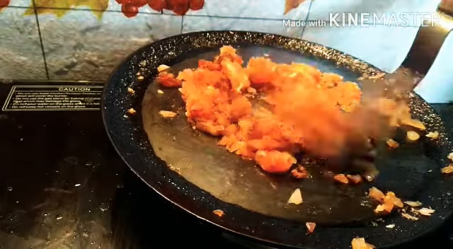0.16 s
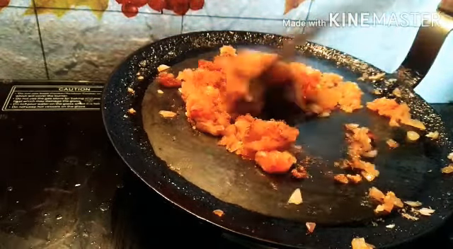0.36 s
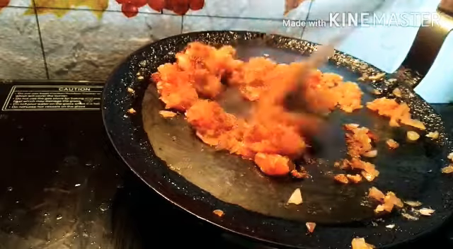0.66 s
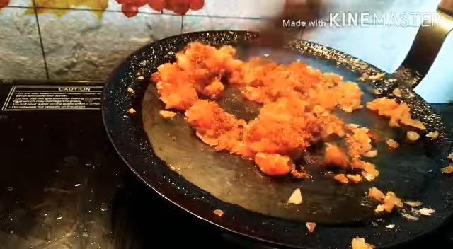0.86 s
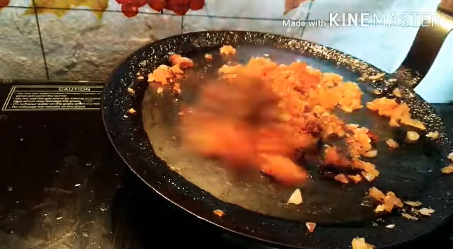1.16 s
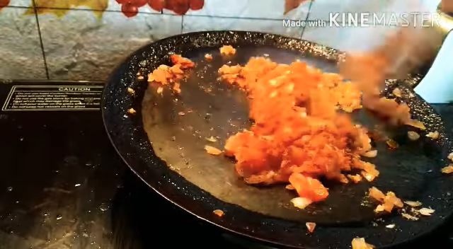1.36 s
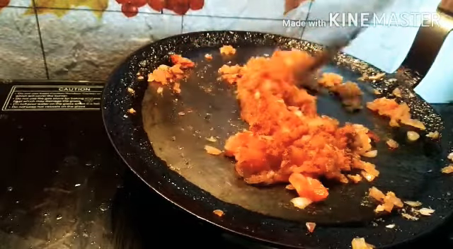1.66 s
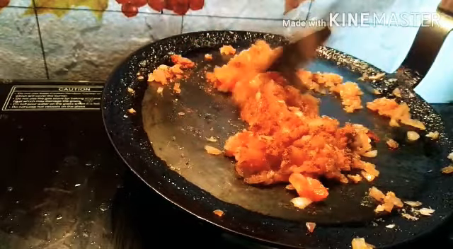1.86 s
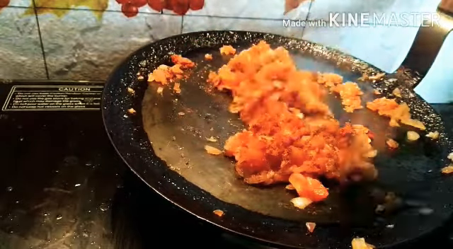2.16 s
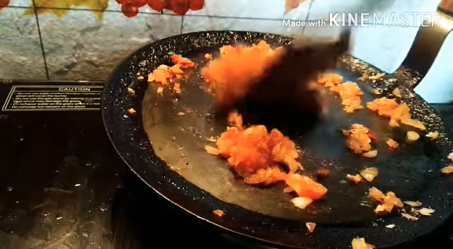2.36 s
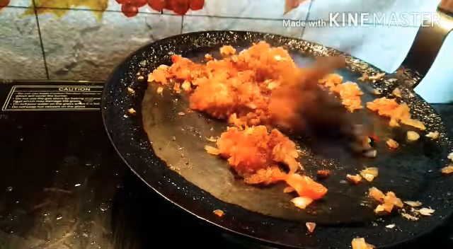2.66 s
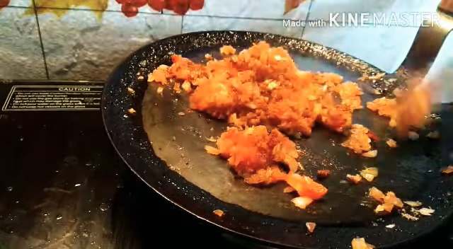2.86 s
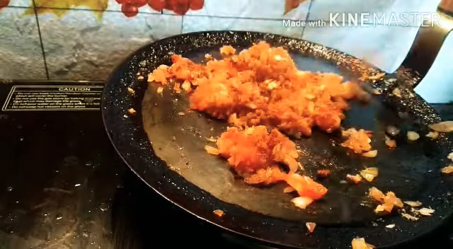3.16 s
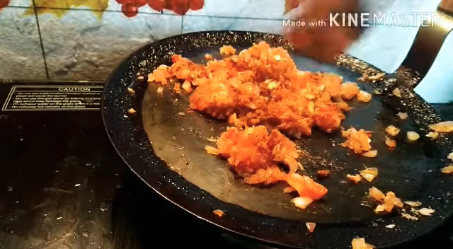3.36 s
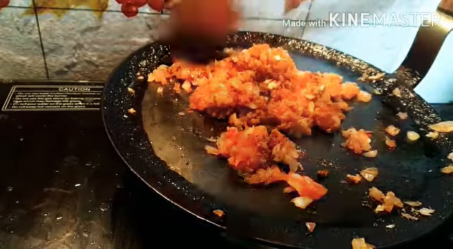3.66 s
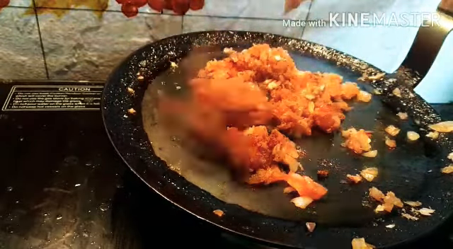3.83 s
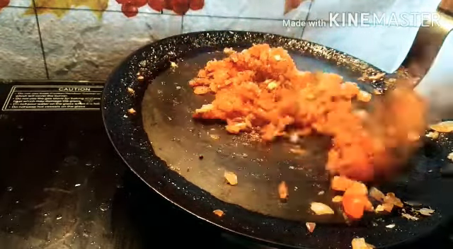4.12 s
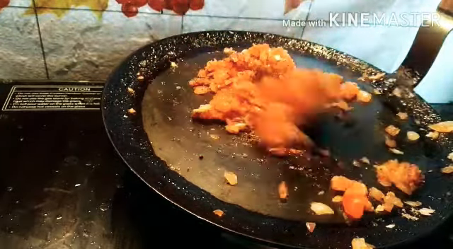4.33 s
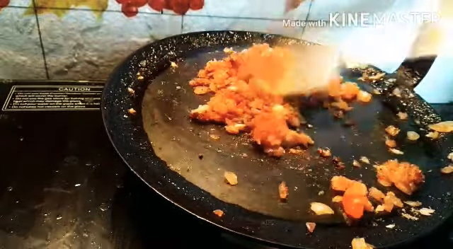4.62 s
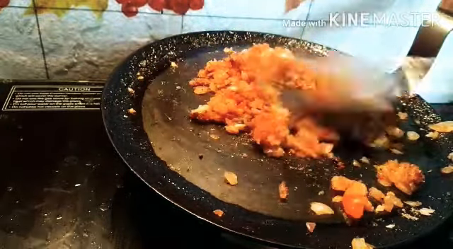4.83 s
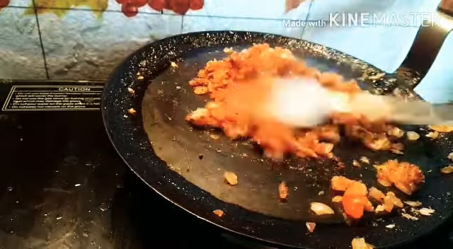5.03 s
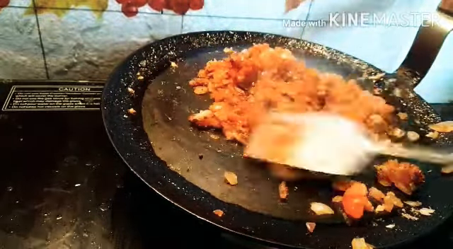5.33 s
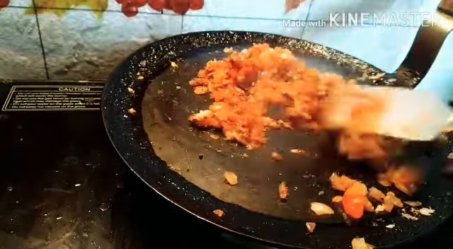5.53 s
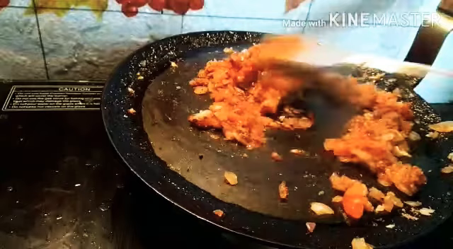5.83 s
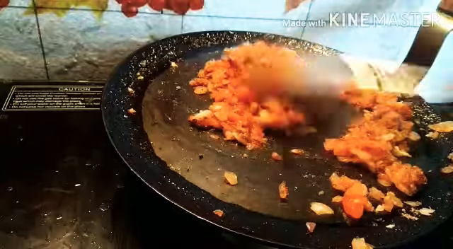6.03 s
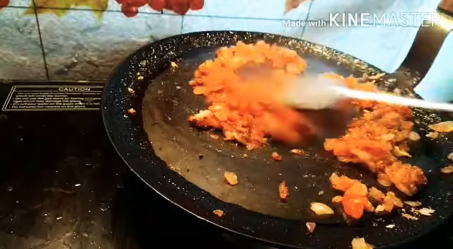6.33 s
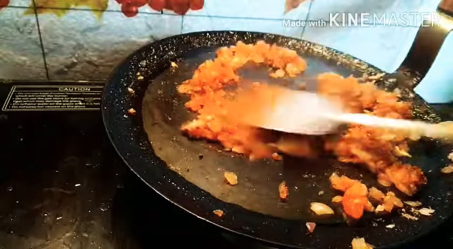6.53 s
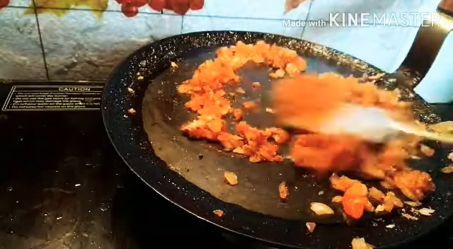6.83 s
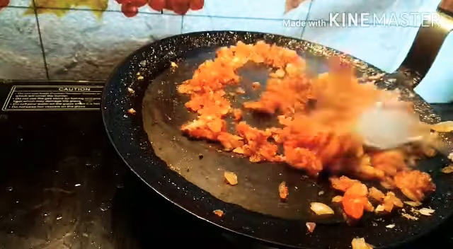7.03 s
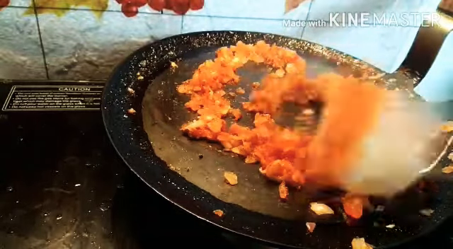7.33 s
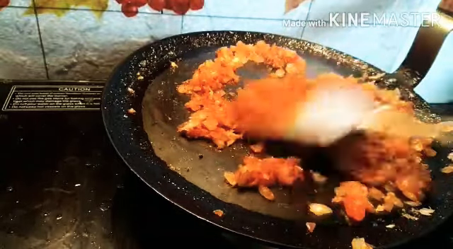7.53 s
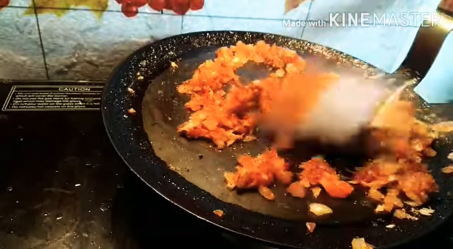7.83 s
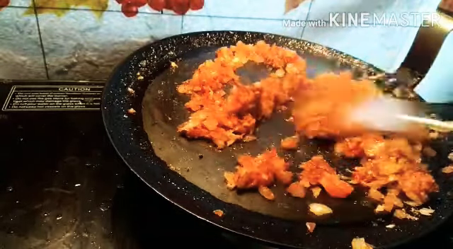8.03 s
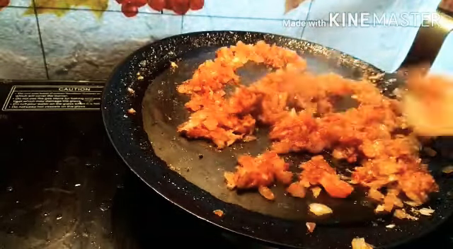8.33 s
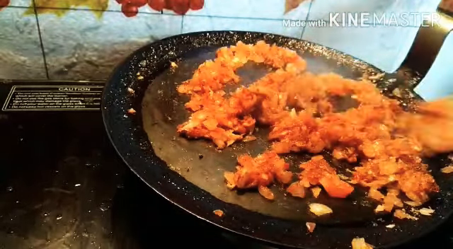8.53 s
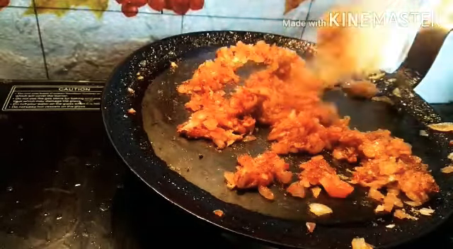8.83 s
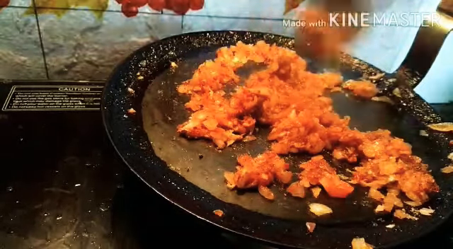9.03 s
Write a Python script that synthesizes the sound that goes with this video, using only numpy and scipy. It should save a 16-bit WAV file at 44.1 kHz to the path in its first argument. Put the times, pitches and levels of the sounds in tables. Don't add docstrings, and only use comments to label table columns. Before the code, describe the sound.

Faint, steady frying fizz underlies irregular metal-on-iron strikes, captured very close in stereo with slight room reflections. Early clacks come about every half second, crisp and ringing briefly, each followed by a short scrape and a dull thump of food and pan. The middle turns quiet, with low muffled knocks and soft brushing. Weak scrapes return after seven seconds, and a hard metallic hit closes it.

```python
import sys
import numpy as np
from scipy import signal
from scipy.fft import rfft, irfft, next_fast_len
from scipy.io import wavfile
from scipy.ndimage import map_coordinates

SR = 44100
rng = np.random.default_rng(int(sys.argv[2]) if len(sys.argv) > 2 else 0)


def put_to_file(sound):
    columns = np.atleast_2d(sound).T
    safe = np.clip(columns, -1, 1)
    whole_steps = np.round(safe * 32767)
    wavfile.write(sys.argv[1], SR, whole_steps.astype(np.int16))


def linear_from_db(decibels):
    return 10 ** (np.asarray(decibels, float) / 20)


N = 404838


def rms_one(x):
    return x / np.sqrt(np.mean(x ** 2) + 1e-20)


def at_hz(points, hz):
    table_hz, values = np.transpose(points)
    return np.interp(np.log(hz + 1), np.log(table_hz), values)


def colour(x, gain):
    size = next_fast_len(N + 4096)
    hz = np.arange(size // 2 + 1) * SR / size
    return irfft(rfft(x, size) * gain(hz), size)[..., :N]


def band(x, low_hz, high_hz):
    return signal.sosfilt(signal.butter(2, [low_hz, high_hz], "band", fs=SR, output="sos"), x)


def wander(depth_db, per_s):
    knots = linear_from_db(depth_db * rng.standard_normal(400))
    return np.interp(np.arange(N) * per_s / SR, np.arange(400), knots)


def patchy(x, depth_db, width_hz, length_s):
    hz, s, cells = signal.stft(x, SR, nperseg=1024)
    knots = rng.standard_normal((240, 400))
    where = np.meshgrid(hz / max(width_hz, 100), s / max(length_s, 0.025), indexing="ij")
    chance = map_coordinates(knots, where, order=1)
    gain = linear_from_db(depth_db * np.minimum(chance, 0.31 * chance))
    return signal.istft(cells * gain, SR, nperseg=1024)[1][:, :N]


def grit(per_s, spread_db):
    # (frequency [Hz], left-right correlation)
    likeness = [(60, 0.9), (180, 1), (550, 0.48), (1650, 0.3), (4970, -0.32), (15000, -0.13)]
    sizes = linear_from_db(spread_db * np.minimum(rng.exponential(1, (2, N)), 5))
    sizes = sizes * rng.choice([-1, 1], (2, N))
    mid, side = sizes * (rng.random((2, N)) < per_s / SR)
    mid = colour(mid, lambda hz: np.sqrt(1 + np.clip(at_hz(likeness, hz), 0, 1)))
    side = colour(side, lambda hz: np.sqrt(1 - np.clip(at_hz(likeness, hz), 0, 1)))
    return rms_one(np.array([mid + side, mid - side]))


def body(force, modes, wander_db, wander_per_s):
    out = 0
    for hz, level_db, t60 in modes:
        r = linear_from_db(-60 / (t60 * SR))
        w = 2 * np.pi * hz / SR
        drive = force * wander(wander_db, wander_per_s) * linear_from_db(level_db) * np.sqrt(2 * (1 - r * r))
        out = out + signal.lfilter([0, np.sin(w)], [1, -2 * r * np.cos(w), r * r], drive + 1e-18)
    return out / np.sqrt(np.sum(linear_from_db(2 * np.array(modes)[:, 1])))


def swell(start, fullest, end, power):
    away = np.interp(np.arange(N) / SR, [start, fullest, end], [1, 0, 1])
    return linear_from_db(-23.5 * away ** power) * (away < 1)


def kitchen(x):
    t60_s, level_db = 0.37, -18
    t = np.arange(SR // 2) / SR
    tail = rng.standard_normal((2, len(t))) * linear_from_db(-60 * t / t60_s) * (t > 0.004)
    tail = signal.lfilter([1], [1, -0.3], tail)
    tail = tail / np.sqrt(np.sum(tail[0] ** 2))
    return linear_from_db(level_db) * signal.fftconvolve(x, tail, axes=1)[:, :N]


def sizzle():
    # (time [s], level [dB])
    frying = [(0.0, -49.5), (0.51, -52), (0.69, -49.5), (2.12, -48), (3.3, -50.5), (3.58, -49.5),
              (4.58, -52), (5.47, -52), (6.59, -51), (7.62, -51), (7.85, -52.5), (8.97, -53.5), (9.18, -52)]
    # (frequency [Hz], density [dB per Hz])
    pop_spectrum = [(24, -28), (40, -20), (96, -4.5), (180, -11), (516, -9.5), (831, -12), (1340, -13.5),
                    (1480, -7), (1720, -9), (3930, -7.5), (4570, -5.5), (7000, -8.5), (11600, 1.5),
                    (14800, -4.5), (16000, -14.5)]
    pops = colour(grit(per_s=15000, spread_db=3.0), lambda hz: linear_from_db(at_hz(pop_spectrum, hz)))
    pops = patchy(pops, depth_db=8.0, width_hz=96, length_s=0.037)
    s, level_db = np.transpose(frying)
    level_db = np.interp(np.arange(N) / SR, s, level_db)
    return linear_from_db(level_db + 2.5) * wander(0.41, per_s=4.0) * rms_one(pops)


def food_motion():
    # (thud [dB], tumble [dB])
    rest_db = (-71.5, -77)
    # (time [s], thud [dB], tumble [dB])
    jolts = [(.195, -34.5, -33), (.61, -83, -44), (1.015, -47, -28), (1.52, -39.5, -36.5),
             (1.84, -46, -32.5), (2.25, -36.5, -24.5), (2.975, -38, -25), (3.45, -60, -36),
             (4.26, -40, -29.5), (7.1, -40, -43), (9.05, -84, -33)]
    # (thud [dB/s], tumble [dB/s])
    jolt_fade = (152, 227.5)
    # (start [s], fullest [s], end [s], thud [dB], tumble [dB])
    rolls = [(-.2, 0.046, 0.31, -85, -48.5), (0.857, 0.986, 0.99, -81, -58), (2.56, 2.656, 2.6, -85, -65),
             (2.765, 2.92, 2.99, -59, -75), (2.977, 3.133, 3.42, -97, -56), (3.987, 4.13, 4.6, -87, -63),
             (5.248, 5.495, 5.7, -61.5, -59.5), (5.65, 5.755, 5.84, -61, -52.5),
             (5.777, 5.917, 6.06, -39.5, -85), (6.223, 6.33, 6.43, -59, -50), (7.118, 7.19, 7.2, -52, -60),
             (6.35, 6.46, 6.65, -54, -85), (6.698, 6.84, 7.7, -66, -95.5), (6.856, 6.962, 7.08, -73, -66),
             (7.284, 7.402, 7.55, -82, -59.5), (7.448, 7.553, 7.7, -48, -59), (7.648, 7.796, 8.1, -77, -56),
             (8.29, 8.4, 8.55, -61, -58.5), (8.497, 8.643, 8.92, -64, -55)]
    motion = linear_from_db(np.array(rest_db))[:, None] * np.ones(N)
    t = np.arange(SR // 2) / SR
    for s, *levels_db in jolts:
        at = round(s * SR)
        settling = linear_from_db(np.c_[levels_db] - np.c_[list(jolt_fade)] * t)
        motion[:, at:at + len(t)] += settling[:, :N - at]
    for start, fullest, end, *levels_db in rolls:
        motion += linear_from_db(np.c_[levels_db]) * swell(start, fullest, end, power=1.38)
    return motion


def food():
    # (frequency [Hz], level [dB], t60 [s])
    pan_modes = [(91.6, -5, 0.105), (120, -2.5, 0.035), (265, -6.5, 0.11), (351, -1.5, 0.027),
                 (413, -3.5, 0.053), (518, 4, 0.061), (599, -6, 0.05)]
    # (time [s], peak [dB], hollow knock [dB])
    bumps = [(0.617, -70, -30), (2.619, -69, -65), (5.381, -47, -54.5), (5.479, -56, -64),
             (5.569, -65, -52), (5.75, -67, -52), (5.808, -30, -61), (5.852, -23, -63), (5.875, -25, -65),
             (5.925, -25.5, -70), (6.028, -40, -54), (6.919, -64, -67), (7.118, -44, -40), (7.19, -32, -54),
             (7.597, -35, -57), (7.752, -72, -54), (7.865, -61, -41.5), (8.419, -38, -61),
             (8.565, -27.5, -56), (8.619, -51, -43), (8.76, -64, -52)]
    lumps = grit(per_s=2500, spread_db=2.0)
    thud, tumble = linear_from_db(-2.0) * food_motion()[:, None] * lumps
    s, peak_db, knock_db = np.transpose(bumps)
    at = [round((time - 0.006) * SR) for time in s]
    thud[:, at] += linear_from_db(peak_db + 13.5)
    tumble[:, at] += linear_from_db(knock_db + 21.0)
    low = band(body(thud, pan_modes[:2], wander_db=4.5, wander_per_s=7.3), 37, 150)
    hollow = band(body(tumble, pan_modes[2:], wander_db=7.0, wander_per_s=12), 248, 610)
    return low + hollow


def edge_catch():
    # (time [s], peak [dB], centre [Hz], width [Hz], decay [s])
    snags = [
        (8.0755, -25, 11600, 700, 0.025),
        (8.125, -38, 5700, 1000, 0.05),
        (8.122, -44, 2000, 500, 0.03),
        (4.836, -46, 11300, 1200, .025),
    ]
    noise, out = rng.standard_normal((2, N)), 0
    for s, peak_db, hz, width_hz, decay_s in snags:
        t = np.arange(N) / SR - s
        rasp = rms_one(band(noise, hz - width_hz / 2, hz + width_hz / 2))
        out = out + linear_from_db(peak_db) * (t > 0) * np.exp(-np.maximum(t, 0) / decay_s) * rasp
    return out


def sliding_force():
    # (time [s], grinding [dB], fade [dB/s], edge brightness [dB], plate weight [dB])
    skids = [(0.205, -27.5, 214, 6, -1.5), (0.608, -29.5, 144, 4.5, -8), (1.011, -27.5, 231, 5, -4.5),
             (1.517, -23.5, 165, 3, -7), (1.836, -28.5, 144, 8.5, 3.5), (2.247, -20.5, 159, 6.5, 2.5),
             (2.971, -18.5, 245, 3.5, -3), (3.446, -28, 157, 4, 7), (4.255, -18.5, 231, 7, 0),
             (7.096, -43.5, 88, -3.5, -5), (7.472, -28.5, 213, 5, -9.5), (8.073, -47, 199, 16, 2),
             (9.046, -21, 181.5, -0.5, -7.5)]
    # (edge [dB/s], shank [dB/s], plate [dB/s])
    skid_shift = (15.5, -33, -120)
    # (start [s], fullest [s], end [s], grinding [dB], edge brightness [dB])
    sweeps = [(-.05, .02, 0.24, -57, 6.5), (0.415, 0.61, 0.61, -45, -6), (1.153, 1.202, 1.285, -41.5, 1.5),
              (1.876, 1.93, 2.017, -39.5, 10), (2.495, 2.658, 2.79, -48.5, -4),
              (3.903, 3.994, 3.92, -52, 5), (4.63, 4.658, 4.86, -51.5, -8), (4.798, 4.855, 4.86, -51.5, 3),
              (5.3, 5.434, 5.6, -58.5, 6), (5.897, 6.001, 6.13, -39, -10), (6.206, 6.304, 6.4, -46.5, -11),
              (7.406, 7.47, 7.48, -47, -3), (7.137, 7.17, 6.56, -45.5, 7), (8.112, 8.16, 8.23, -48.5, 2),
              (9.14, 9.195, 9.7, -40, -4)]
    # (start [s], fullest [s], end [s], grinding [dB], shank weight [dB])
    presses = [(1.16, 1.246, 1.236, -43, -31), (4.673, 4.754, 4.88, -61, 11.5),
               (5.414, 5.467, 6.05, -68, 0), (5.622, 5.658, 5.76, -55.5, -9), (6.248, 6.33, 6.41, -50, 0),
               (7.146, 7.162, 7.27, -44.5, -12.5), (8.53, 8.555, 8.6, -53.5, -9),
               (8.593, 8.613, 8.68, -53.5, -17), (9.08, 9.174, 9.7, -37, -10)]
    bite_s, lift_off_db_per_s2 = 0.017, 299
    lead_in_s, lead_in_db = 0.016, -25
    sliding = np.zeros((4, N))
    t = np.arange(SR // 2) / SR
    lead = round(lead_in_s * SR)
    for s, grind_db, fade, edge_db, plate_db in skids:
        at = round(s * SR)
        shares_db = np.array([[0], [edge_db], [-3 + 0.34 * plate_db], [plate_db]])
        fades = fade - np.array([0, *skid_shift])[:, None]
        fall_db = fades * np.maximum(t - bite_s, 0) + lift_off_db_per_s2 * t ** 2
        skid = np.minimum(t / bite_s, 1) * linear_from_db(grind_db + shares_db - fall_db)
        sliding[:, at - lead:at] += linear_from_db(grind_db + lead_in_db + shares_db) * np.linspace(0, 1, lead)
        sliding[:, at:at + len(t)] += skid[:, :N - at]
    for *span, grind_db, edge_db in sweeps:
        shares_db = np.array([[0], [edge_db], [-6], [-21.5]])
        sliding += linear_from_db(grind_db + shares_db) * swell(*span, power=2)
    for *span, grind_db, shank_db in presses:
        sliding[2:] += linear_from_db(grind_db + np.array([[shank_db], [0]])) * swell(*span, power=2)
    return sliding


def striking_force():
    # (time [s], peak [dB], edge brightness [dB], shank weight [dB], plate weight [dB])
    blows = [(0.19, -33, -1, -10, 9), (0.6083, -11.5, 5, -12, -12), (1.0124, -12, -0.5, 1, 4),
             (1.514, -12, 7, -10.5, -18), (1.5262, -18, 0, -16, -16), (1.8371, -11, 6, -8.5, 4.5),
             (2.248, -4.5, 10.5, -8, -6), (2.974, 0.5, -1, -17, -17), (3.4474, -3.5, 0.5, -9, 0),
             (4.255, 1.5, 0.5, -15, -14), (6.3094, -44, -14, -15, 11), (7.099, -26.5, -19, -11, -22),
             (7.469, -22.5, 4.5, -26, -25), (8.074, -38.5, 14, -6, -5), (9.0478, 1.5, -5.5, -18.5, -6)]
    # (time [s], peak [dB], edge brightness [dB])
    hops = [(0.676, -38, 15), (1.562, -18.5, -2), (1.9208, -22.5, -1), (2.333, -16.5, -17),
            (4.6573, -51, -10), (4.833, -48, 13), (6.242, -39, -14), (7.171, -38, 0), (8.1283, -47.5, 9)]
    hop_shank_db, hop_plate_db = -12, -22.5
    striking = np.zeros((4, N))
    t = np.arange(SR // 2) / SR
    pulse = (1 - np.exp(-t / 0.0022)) * np.exp(-t / 0.0046)
    contacts = blows + [(*hop, hop_shank_db, hop_plate_db) for hop in hops]
    for s, peak_db, edge_db, shank_db, plate_db in contacts:
        at = round(s * SR)
        shares_db = np.array([[0], [edge_db + 3.0], [shank_db + 12.0], [plate_db + 4.0]])
        striking[:, at:at + len(t)] += linear_from_db(peak_db - 3 + shares_db) * pulse[:N - at]
    return striking


def spatula():
    # (frequency [Hz], level [dB], t60 [s])
    blade_modes = [(3930, -20.5, .04), (3760, -13.5, 0.02), (4500, -12.5, 0.15), (4730, -10.5, 0.15),
                   (4870, 9, 0.059), (5260, 5, 0.16), (5760, 7.5, 0.11), (6560, -7, 0.016)]
    # (frequency [Hz], level [dB], t60 [s])
    edge_modes = [(7860, -27.5, .03), (8360, 3.5, 0.055), (8960, -8, 0.063), (9700, -36, .03),
                  (9840, 3, .05), (11160, -3, 0.068), (10850, -20.5, 0.033), (10540, -7.5, 0.042),
                  (11300, 3.5, 0.054), (13600, -8, 0.032), (12750, -5, .03), (13900, -0.5, 0.017)]
    # (frequency [Hz], level [dB], t60 [s])
    shank_modes = [(1465, -2.5, 0.2), (1483, 3.5, 0.088), (1957, 11, 0.029), (1990, -13, 0.023),
                   (2687, 0.5, 0.019), (3100, -17, 0.081)]
    # (frequency [Hz], level [dB], t60 [s])
    plate_modes = [(765, 1.5, 0.11), (845, -0.5, 0.06), (884, 1.5, 0.075), (918, 14.5, 0.053),
                   (980, -8.5, 0.076)]
    # (frequency [Hz], density [dB per Hz])
    grind_spectrum = [(180, -38.5), (300, -1.5), (519, -17.5), (762, -52.5), (915, -2.5), (1060, -3.5),
                      (1410, -3), (2360, -8), (4670, -8.5), (7320, -8), (11300, -5), (15200, -14),
                      (16000, -41.5)]
    contacts = grit(per_s=6000, spread_db=3.0)
    rasping = colour(contacts, lambda hz: linear_from_db(at_hz(grind_spectrum, hz)))
    rasping = patchy(rasping, depth_db=16.0, width_hz=170, length_s=0.05)
    # (modes, low [Hz], high [Hz], ring on a blow [dB], ring on a slide [dB], rasp [dB], wander [dB],
    #  left over right [dB], rasp polarity)
    parts = [(blade_modes, 3450, 7700, -3, -13, -1.5, 3.5, -0.6, 1),
             (edge_modes, 7700, 16000, -4, -14, -1.5, 4, 0.6, -1),
             (shank_modes, 1200, 3450, -4, -13, -1.5, 3, -0.6, -1),
             (plate_modes, 620, 1150, -2, -2, -11, 1.5, -4, 1)]
    out = 0
    for slide, blow, part in zip(sliding_force(), striking_force(), parts):
        modes, low_hz, high_hz, blow_db, slide_db, rasp_db, wander_db, side_db, polarity = part
        push = linear_from_db(blow_db) * blow + linear_from_db(slide_db) * slide
        ring = band(body(push * contacts, modes, wander_db, wander_per_s=12), low_hz, high_hz)
        rasp = polarity * linear_from_db(rasp_db) * (slide + blow) * rms_one(band(rasping, low_hz, high_hz))
        out = out + (ring + rasp) * linear_from_db(np.array([[side_db], [-side_db]]) / 2)
    return out


def scene():
    near = spatula() + food()
    frying = sizzle()
    near = near + edge_catch()
    return near + kitchen(near) + frying


def band_limit(x):
    return signal.sosfilt(signal.butter(12, 16430, fs=SR, output="sos"), x)


def record(dry):
    # (frequency [Hz], left over right [dB])
    port_tilt = [(60, 1.5), (150, -1.5), (380, 0), (900, 0.5), (2400, -0.5), (4400, -4), (6500, -2),
                 (8500, 4.5), (11000, 12.5), (15000, 16.5)]
    shares = np.array([[0.3], [-0.7]])
    ports = colour(dry, lambda hz: linear_from_db(at_hz(port_tilt, hz) * shares))
    ports = 0.8 * np.tanh(ports / 0.8)
    ports = signal.sosfilt(signal.butter(2, 45, "high", fs=SR, output="sos"), ports)
    ports = signal.sosfilt(signal.cheby2(16, 60, 15800, fs=SR, output="sos"), ports)
    return band_limit(ports)


dry = scene()
out = record(dry)
put_to_file(out)
```